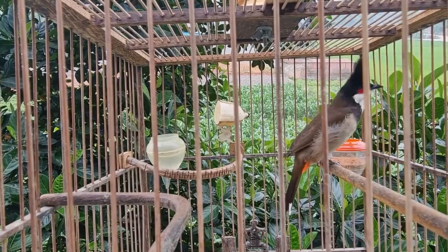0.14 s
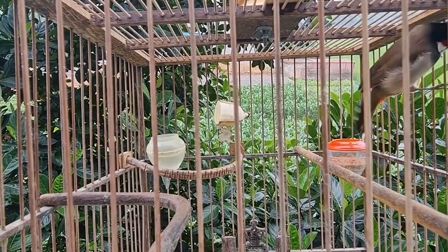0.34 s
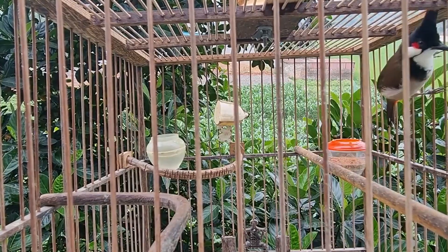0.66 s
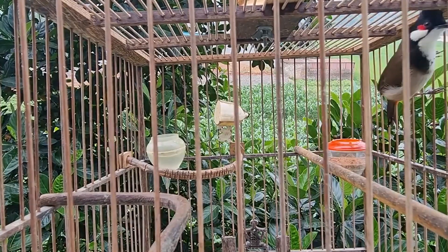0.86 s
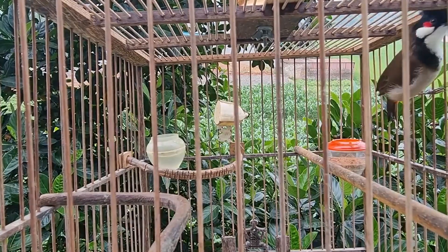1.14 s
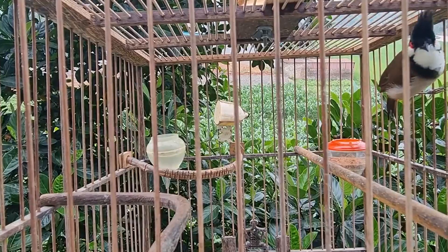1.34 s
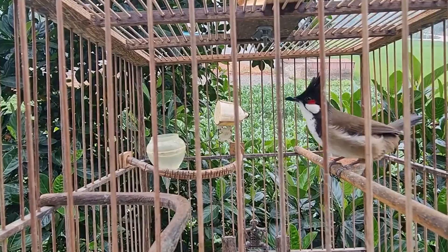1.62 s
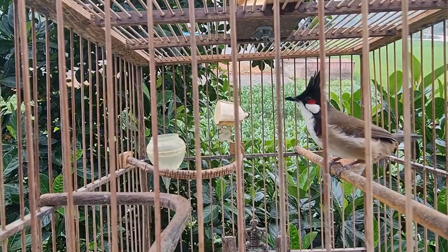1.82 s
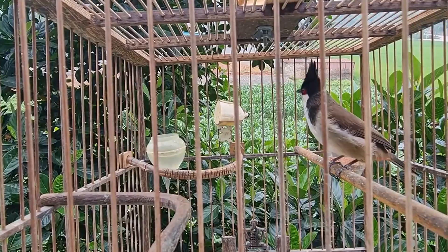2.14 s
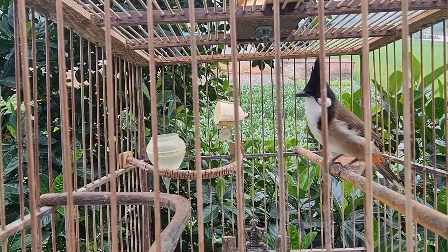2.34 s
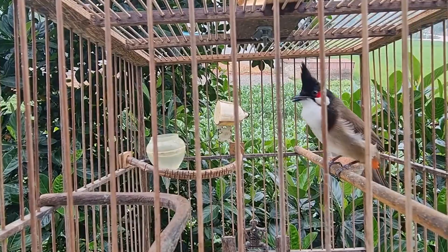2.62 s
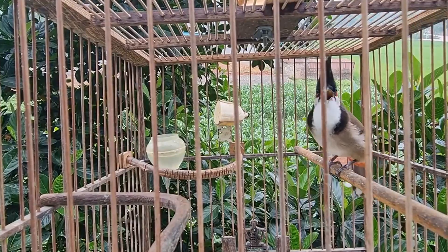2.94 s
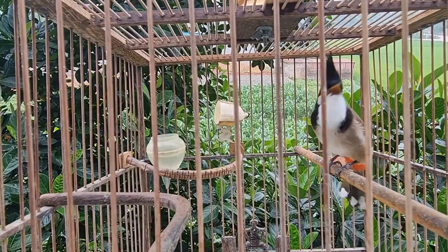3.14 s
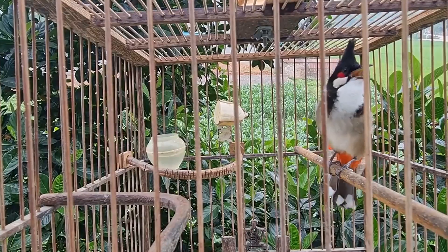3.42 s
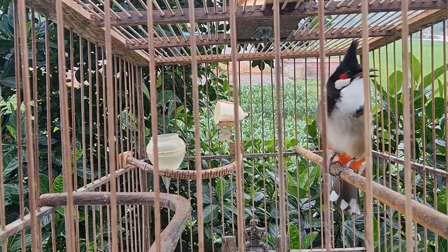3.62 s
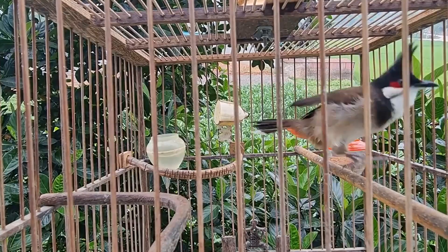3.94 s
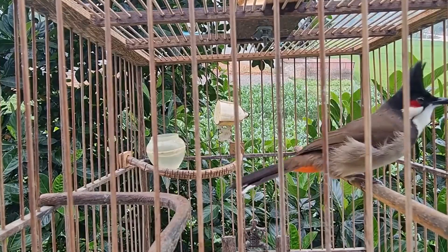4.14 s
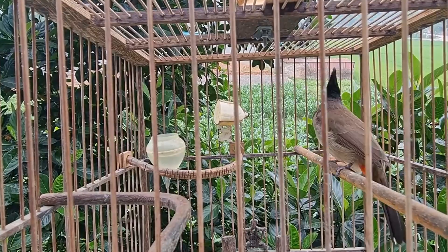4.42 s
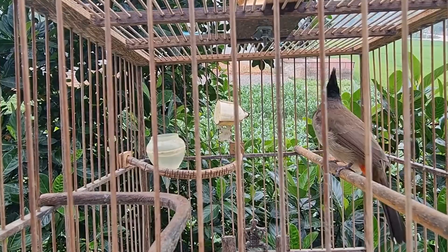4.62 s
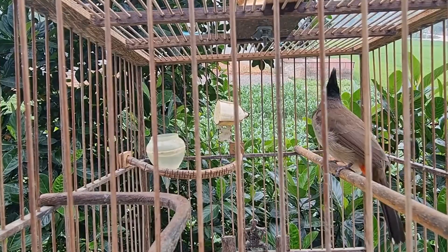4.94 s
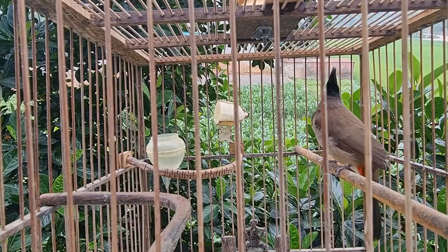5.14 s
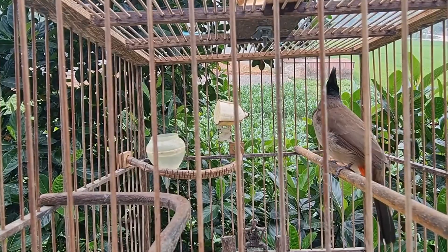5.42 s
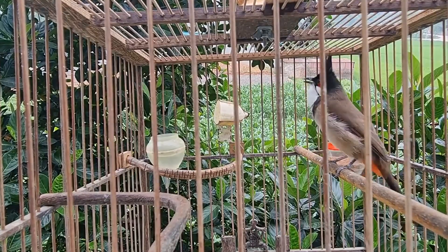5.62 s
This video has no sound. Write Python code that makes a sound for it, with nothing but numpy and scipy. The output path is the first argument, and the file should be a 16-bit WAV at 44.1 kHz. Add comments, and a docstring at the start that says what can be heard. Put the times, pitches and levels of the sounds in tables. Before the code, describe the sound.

The first two and a half seconds are quiet: faint falling whistles, chirps and soft hoots come from distant garden birds over a very low traffic rumble and hiss. A caged bulbul close by flicks its wings at about 0.5 seconds and again around 1.6, landing on its wooden perch with a soft thud. At 2.7 seconds it starts singing, loud and bright: quick, nearly pure whistled notes with a fast warble and a slightly raspy edge, many sweeping upward, running together until 3.9. A tiny hop follows at about 4 seconds, then one faint, distant hard knock at 4.4. From 4.6 a far engine putters softly. The bird sings one loud rising note at 5.2 and a short warbled phrase from about 5.5 to 5.7. The song sounds close, with only slight, quick reflections from the cage.

```python
"""Caged bulbul in a garden.

A red-whiskered bulbul sings short phrases close by: a nearly pure syrinx tone with a fast warble,
a raspy edge shaped by the beak, and quick echoes off its wooden cage. Before and between phrases
it hops, wings rustling and perch thudding. Other birds whistle further off and something hard is
knocked once. A far engine putters near the end; traffic rumble and faint hiss lie under it all."""
import sys
import numpy as np
from scipy import signal
from scipy.fft import rfft, irfft
from scipy.io import wavfile
from scipy.ndimage import uniform_filter1d, minimum_filter1d

SR = 44100
rng = np.random.default_rng(int(sys.argv[2]) if len(sys.argv) > 2 else 0)


def store_wav(level_fs):
    """Save 16-bit WAV to argv[1]."""
    pcm = np.round(np.clip(np.atleast_2d(level_fs), -1, 1) * 32767)
    wavfile.write(sys.argv[1], SR, pcm.T.astype(np.int16))


N = 254456
TIME = np.arange(N) / SR
CUTOFF_HZ = 16000

# Song notes: start_s, length_s, level_db, attack_s, release_s, warble_hz, depth_hz, pitch_path_hz
SONG_NOTES = [ (2.7256, .066, -9.5, .031, .009, 122, 39, (1353, 1650, 1799, 2266, 2174, 1737)),
              (2.7848, .048, -10.5, .007, 0.022, 108, 49, (1870, 2196, 2298, 1977, 1125)),
              (2.8136, 0.025, -12.5, .01, 0.019, 270, 340, (3150, 2100)),
              (3.0446, .041, -9, 0.01, 0.006, 88, 348, (2275, 2402, 2973, 3084, 2830)),
              (3.085, .013, -33.5, 0.013, .01, 100, 102, (2030, 570)),
              (3.2188, .06, -7.5, 0.038, .007, 109, 280, (1450, 1594, 2378, 2518, 2755, 3028, 2923, 2470)),
              (3.2784, 0.048, -15.5, .006, .01, 215, 140, (2604, 2244, 2165, 2320, 2570)),
              (3.3819, 0.019, -19.5, .004, .005, 185, 299, (2150, 2530)),
              (3.3945, 0.05, -6.5, .008, 0.016, 120, 21, (2890, 2894, 2840, 3000)),
              (3.492, 0.1, -11, 0.06, .063, 93, 350, (1428, 1687, 2578, 3080, 3503, 3873, 3979)),
              (3.6352, .066, -11, 0.03984, .018, 93, 116, (1650, 2168, 3390, 3088, 3244, 3120, 3210)),
              (3.7375, .027, -18.5, .007, 0.0022, 104, 182, (2650, 2580)),
              (3.7606, .033, -10, 0.00699, 0.014, 122, 26, (2490, 2390, 2240)),
              (3.7896, .051, -14, .003, 0.033, 112, 140, (2428, 2377, 2162, 2260)),
              (3.8311, 0.063, -24.5, 0.0068, 0.018, 108, 35, (1755, 1753)),
              (5.1945, 0.093, -8, 0.023, 0.029, 278, 225, (1253, 3213, 3314, 3354, 3503, 3757, 4055)),
              (5.5505, .114, -9, 0.044, 0.025, 93, 228, (1795, 2278, 2431, 2820, 2937, 2896, 2850)),
              (5.7056, 0.037, -14.5, 0.024, .018, 128, 33, (2104, 1933, 2570, 2250, 2290)), ]
# Head poses: from_s, bright_db, beak_hz, pan_left_db, lead_scale, garden_db
HEAD_POSES = [ (2.6, 2, 13060, -1, .95, -8.5), (2.95, 1.5, 12520, 0, 1.07, -7.5),
              (3.15, 3, 11520, 0.6, 1.1, -5.5), (3.35, 0, 14400, 1.8, 1.12, -7.5),
              (3.46, 5.5, 11200, 1.5, 1.25, -1.5), (3.6, 5, 9910, 1.5, 1.37, 0),
              (3.71, -0.5, 13250, 6, 1.85, -5), (5, -0.5, 8830, -0.5, 1.03, -4),
              (5.4, -1.5, 9300, -.8, 0.92, -1.5), (5.68, 0.5, 14100, -.8, 0.85, -1.5), ]
# Phase lead of the left channel: freq_hz, lead_rad
LEFT_LEAD = [(300, .1), (1400, .5), (2300, 0.54), (3000, 1.3), (3900, 2.48), (5000, 5.4), (6400, .1),
             (16000, .05)]
# Syrinx overtones and half-order partials: pitch_ratio, gain_db
SONG_PARTIALS = [(.5, -54.5), (1.5, -57.5), (2, -49), (3, -47), (4, -49.5), (5, -42.5), (6, -39.5),
                 (7, -51.5)]
# Rasp spectrum: freq_hz, gain_db
RASP_SPECTRUM = [(700, -13), (1500, -1), (3500, 3.5), (4400, -16), (5200, -21), (6800, -7.5), (8000, -10),
                 (9500, -4), (12500, -2.5), (14800, -2), (16000, -8.5)]


def bulbul(jitter_hz=8, jitter_share=.23, crest_share=.25, blur_rad=.092, rasp_db=-51, edge_power=.75,
           clean_below_hz=1300, warble_onset_span_hz=1050, throb_scale_hz=370):
    """Syrinx tone, warbling in pitch and loudness. Returns tone, bright edge and garden send."""
    tone, bright, thrown = np.zeros((2, N)), np.zeros((2, N)), np.zeros(N)
    rasp = from_db(rasp_db) * noise(RASP_SPECTRUM, [(700, .6), (16000, .7)])[0]
    wander, blur = drift(900, N), blur_rad * drift(1200, N)
    for start, length, level_db, attack, release, warble_hz, depth_hz, pitches in SONG_NOTES:
        pose = [row for row in HEAD_POSES if row[0] <= start + length / 2][-1]
        _, bright_db, beak_hz, pan_db, lead_scale, garden_db = pose
        on = (TIME >= start) & (TIME <= start + length)
        age = TIME[on] - start
        pitch = np.interp(age, np.linspace(0, length, len(pitches)), pitches)
        depth = depth_hz * np.clip((pitch - clean_below_hz) / warble_onset_span_hz, 0, 1)
        cycle = 2 * np.pi * warble_hz * age
        warbled = pitch + depth * (-.74 * np.cos(cycle) + crest_share * np.cos(2 * cycle))
        jitter = (jitter_hz + jitter_share * depth) * wander[on]
        phase = 2 * np.pi * np.cumsum(warbled + jitter) / SR
        throb = np.tanh(depth / throb_scale_hz)
        tremolo = (1 - throb * np.cos(cycle)) / np.sqrt(1 + throb ** 2 / 2)
        level = from_db(level_db) * envelope(age, length, attack, release) * tremolo
        lead_rad = lead_scale * at_hz(LEFT_LEAD, warbled)
        whistle = np.sqrt(2) * level * np.sin([phase + lead_rad, phase])
        partials = sum(from_db(db) * np.sin(ratio * (phase + blur[on])) * (ratio * pitch < CUTOFF_HZ)
                       for ratio, db in SONG_PARTIALS)
        # The edge grows more slowly than the tone.
        edge = from_db(bright_db) * np.abs(level) ** edge_power * (partials + rasp[on])
        tone[:, on] += from_db(np.array([[pan_db], [-pan_db]]) / 2) * whistle
        bright[:, on] += beak(edge, beak_hz)
        thrown[on] += from_db(garden_db) * whistle[1]
    return tone, bright, thrown


def envelope(age_s, length_s, attack_s, release_s, edge_db=-29, fade_s=.002):
    """Note gain: swells from edge_db, holds, sinks back."""
    opening = np.clip(1 - age_s / attack_s, 0, 1) ** 2
    closing = np.clip(1 - (length_s - age_s) / release_s, 0, 1) ** 2
    fade = np.clip(np.minimum(age_s, length_s - age_s) / fade_s, 0, 1)
    return from_db(edge_db * (opening + closing)) * fade


# Throat response: freq_hz, gain_db
THROAT_RESPONSE = [(4200, 0), (4600, -9.5), (5100, -22.5)]


def throat(tone):
    """The throat passes the tone and little above it."""
    hz = np.arange(N // 2 + 1) * SR / N
    return irfft(rfft(tone) * from_db(at_hz(THROAT_RESPONSE, hz)), N)


# Beak notch just above the tone: freq_hz, gain_db
BEAK_NOTCH = [(4300, 3), (5100, -11.5), (6300, -0.5)]


def beak(x, centre_hz, peak_db=8, width_hz=2200, ripple_db=5.5, ripple_hz=450):
    """The open beak favours one treble band; cage bars ripple the spectrum, anew for each note."""
    hz = np.arange(len(x) + 1) * SR / (2 * len(x))
    ripple = np.interp(hz, np.arange(100) * ripple_hz, rng.standard_normal(100))
    resonance_db = peak_db / (1 + (2 * (hz - centre_hz) / width_hz) ** 2)
    gain_db = resonance_db + ripple_db * ripple + at_hz(BEAK_NOTCH, hz)
    return irfft(rfft(x, 2 * len(x)) * from_db(gain_db))[:len(x)]


# Echoes off roof, tray and ground: delay_s, left_db, right_db
CAGE_ECHOES = [(.0021, -18, -22), (.0047, -14, -14), (.0083, -20.5, -20)]


def cage(x):
    """Nearby wood and ground return the song a few milliseconds late."""
    out = x.copy()
    for delay_s, left_db, right_db in CAGE_ECHOES:
        for channel, db in enumerate((left_db, right_db)):
            out[channel] += from_db(db) * np.interp(TIME - delay_s, TIME, x[channel], left=0)
    return out


# Wing flicks: peak_s, width_s, gain_db
WING_FLICKS = [(0.449, 0.014, -51.5), (0.516, 0.0076, -51.5), (0.763, 0.0056, -59), (1.585, 0.0099, -49.5),
               (1.658, 0.013, -55), (4.035, .018, -67.5)]
# Feather spectrum: freq_hz, gain_db
FEATHER_SPECTRUM = [(150, -6), (500, 9), (1100, -1), (2000, -7), (5000, -1), (9000, 0.5), (14000, -5),
                    (16000, -2.5)]


def wings(flutter_db=4, trim_db=-3.5, swell_widths=1.1, fade_widths=1.4, tick_db=2, tick_s=.0015):
    """Feathers swell to a tick and rustle away."""
    puffs = 0
    for peak_s, width_s, db in WING_FLICKS:
        age = TIME - peak_s
        rustle = np.exp(-np.abs(age) / (width_s * np.where(age < 0, swell_widths, fade_widths)))
        tick = from_db(tick_db) * np.exp(-np.abs(age) / tick_s)
        puffs += from_db(db) * (rustle + tick)
    flutter = from_db(flutter_db * drift(700, N) + trim_db)
    return puffs * flutter * noise(FEATHER_SPECTRUM, [(150, .2), (16000, .17)])


# Feet landing: start_s, gain_db
FOOT_LANDINGS = [(.512, -69), (1.615, -88), (1.658, -49.5), (4.09, -60.5)]
# Perch modes: freq_hz, gain_db, t60_s
PERCH_MODES = [(138, 2.5, 0.83), (266, -37, .15), (388, -8, 0.16), (1153, -4.5, 0.081)]


def perch():
    """The perch thuds as the feet land."""
    return strike(FOOT_LANDINGS, PERCH_MODES)


# Falling slurs of a second bulbul: start_s, length_s, pitch_hz, gain_db
SLURS = [(.305, 0.11, 3260, -56.5), (.48, .105, 3227, -55), (.665, 0.093, 3187, -56),
         (.863, .1, 3023, -59.5), (1.084, 0.089, 2973, -60.5), (1.244, 0.12, 2480, -59.5),
         (1.373, 0.12, 2613, -61), (1.94, .09, 2845, -51), (2.147, 0.094, 2840, -62.5)]
# Buzzy rising chirps: start_s, length_s, pitch_hz, gain_db
CHIRPS = [(0, .16, 2900, -70), (1.156, .13, 2400, -63), (1.593, .085, 3330, -56.5),
          (1.785, .057, 2640, -58), (1.892, .069, 3280, -51), (2.093, .066, 3190, -64),
          (2.623, .18, 3490, -53.5)]
# Long thin whistles: start_s, length_s, first_hz, middle_hz, last_hz, gain_db
WHISTLES = [(0.569, .5, 6270, 5100, 4750, -66), (5.002, 0.65, 3605, 3960, 4660, -68.5)]
# Soft arching hoots: start_s, length_s, pitch_hz, gain_db
SOFT_HOOTS = [(1.319, .11, 635, -58), (1.657, .24, 585, -69.5), (2.567, .16, 605, -66.5),
              (4.022, .13, 560, -64)]


def far_birds(trim_db=-1, tsip_every_s=.1865, tsips_until_s=2.7):
    """Five kinds of distant call, each with its own pitch bend, trailing garden echoes."""
    calls = sum(glide(s, length, hz * np.array([.98, .935, .79]), db, depth_hz=85, lateness=1.3)
                for s, length, hz, db in SLURS)
    calls += sum(glide(s, length, hz * np.array([.94, .98, 1.01]), db, depth_hz=.06 * hz)
                 for s, length, hz, db in CHIRPS)
    calls += sum(glide(s, length, path_hz, db, depth_hz=60, lateness=1.34)
                 for s, length, *path_hz, db in WHISTLES)
    calls += sum(glide(s, length, hz * np.array([.86, 1, .89]), db, depth_hz=20)
                 for s, length, hz, db in SOFT_HOOTS)
    # A small bird repeats a thin upsweep.
    calls += sum(glide(s, length_s=.04, path_hz=(4900, 5500, 6500), gain_db=-81.5, depth_hz=90)
                 for s in np.arange(0, tsips_until_s, tsip_every_s))
    echoes = from_db(-6) * scatter(calls, t60_s=.65, top_hz=7000, delay_s=.006)
    return from_db(trim_db) * (calls + echoes)


def glide(start_s, length_s, path_hz, gain_db, depth_hz, lateness=1, warble_hz=105):
    """Warbling whistle bent through three pitches; lateness over 1 delays its swell."""
    out, on = np.zeros(N), (TIME >= start_s) & (TIME < start_s + length_s)
    age = TIME[on] - start_s
    pitch = np.polyval(np.polyfit([0, .5, 1], path_hz, 2), age / length_s)
    pitch += depth_hz * (np.sin(2 * np.pi * warble_hz * age) + .5 * drift(440, len(age)))
    swell = np.sqrt(2 * np.abs(np.sin(np.pi * (age / length_s) ** lateness)))
    out[on] = from_db(gain_db) * swell * np.sin(2 * np.pi * np.cumsum(pitch) / SR)
    return out


# Knock resonances: centre_hz, width_hz, level_db, t60_s
KNOCK_BANDS = [(1231, 50, -56, 0.78), (2903, 170, -50, 0.89), (2930, 740, -56.5, 0.84),
               (6140, 5000, -63.5, .12)]


def knock(start_s=4.445):
    """A distant hard knock; garden echoes smear its resonances into noise bands."""
    age = np.maximum(TIME - start_s, 0)
    ring = 0
    for hz, width_hz, db, t60_s in KNOCK_BANDS:
        resonance = band(rng.standard_normal((2, N)), hz - width_hz / 2, hz + width_hz / 2)
        ring += rms_one(resonance) * from_db(db - 60 * age / t60_s)
    return (age > 0) * ring


# Exhaust modes: freq_hz, gain_db, t60_s
EXHAUST_MODES = [(90, -10, .05), (258, -3, .07), (335, -4, .06)]


def engine(start_s=4.618, beat_hz=13.9, gain_db=-53, uneven_db=2):
    """Slow beats of uneven strength ring a far engine's exhaust."""
    beats_s = np.arange(start_s, TIME[-1], 1 / beat_hz)
    return strike([(s, gain_db + uneven_db * rng.standard_normal()) for s in beats_s], EXHAUST_MODES)


# Traffic spectrum: freq_hz, gain_db
TRAFFIC_SPECTRUM = [(25, -9), (55, -2), (100, -2.5), (170, -9.5), (300, -4.5), (450, -14), (600, -14.5),
                    (1000, -26), (2000, -41), (16000, -80)]
# Traffic course: time_s, level_db
TRAFFIC_LEVELS = [(0, -61.5), (1.0, -60.5), (1.8, -59), (3.0, -61), (3.9, -64), (4.05, -60), (4.35, -61),
                  (4.7, -58.5), (5.77, -60.5)]
# Garden hiss spectrum: freq_hz, gain_db
HISS_SPECTRUM = [(300, -3), (1000, -1), (1600, -4), (2600, 0.5), (3600, -4.5), (5000, -8.5), (9000, -16.5),
                 (12500, -29), (16000, -36.5)]
# Garden hiss course: time_s, level_db
HISS_LEVELS = [(0, -71.5), (1.35, -68.5), (2.4, -68.5), (4.0, -73.5), (4.6, -71), (5.77, -76.5)]
# Left-right likeness of both: freq_hz, correlation
TOWN_CORRELATION = [(30, 0.17), (120, .8), (300, 0.11), (800, 0.034), (16000, 0.089)]


def town(waver_db=.2):
    """Far traffic rumbles, wavering slightly, under the faint hiss of the garden."""
    rumble_db = np.interp(TIME, *np.transpose(TRAFFIC_LEVELS)) + waver_db * drift(12, N)
    rumble = from_db(rumble_db) * noise(TRAFFIC_SPECTRUM, TOWN_CORRELATION)
    hiss_db = np.interp(TIME, *np.transpose(HISS_LEVELS))
    return rumble + from_db(hiss_db) * noise(HISS_SPECTRUM, TOWN_CORRELATION)


def strike(blows, modes):
    """Each blow (start_s, gain_db) rings the same modes (freq_hz, gain_db, t60_s)."""
    clicks = np.zeros(N)
    for start_s, db in blows:
        clicks[min(int(start_s * SR), N - 1)] += from_db(db)
    t = TIME[:SR]
    ring = sum(from_db(db - 60 * t / t60_s) * np.sin(2 * np.pi * hz * t) for hz, db, t60_s in modes)
    return signal.fftconvolve(clicks, ring)[:N]


def scatter(x, t60_s, top_hz, delay_s):
    """Dense decaying reflections, different on each side; unit power gain."""
    t = TIME[:SR]
    tail = band(rng.standard_normal((2, SR)), 300, top_hz) * from_db(-60 * t / t60_s) * (t > delay_s)
    tail /= np.sqrt(np.sum(tail ** 2, axis=1, keepdims=True) + 1e-20)
    return signal.fftconvolve(np.atleast_2d(x), tail, axes=1)[:, :N]


def noise(spectrum, correlation):
    """Stereo noise of given spectrum and left-right correlation; rms 1."""
    hz = np.arange(N // 2 + 1) * SR / N
    alike = np.clip(at_hz(correlation, hz), -1, 1)
    mid, side = rfft(rng.standard_normal((2, N))) * from_db(at_hz(spectrum, hz))
    return rms_one(irfft(np.sqrt(1 + alike) * mid + np.sqrt(1 - alike) * side * [[1], [-1]], N))


def drift(rate_hz, size):
    """Random wander of spread about 1."""
    steps = np.arange(size) * rate_hz / SR
    count = int(steps[-1]) + 2
    return np.interp(steps, np.arange(count), rng.standard_normal(count))


def band(x, low_hz, high_hz):
    """Gentle band-pass."""
    edges_hz = [max(low_hz, 20), min(high_hz, .45 * SR)]
    return signal.sosfilt(signal.butter(2, edges_hz, "band", fs=SR, output="sos"), x)


def at_hz(points, hz):
    """Interpolate on a log-frequency axis."""
    freqs, values = np.transpose(points)
    return np.interp(np.log(np.maximum(hz, 1)), np.log(freqs), values)


def from_db(db):
    """Decibels to gain."""
    return 10 ** (np.asarray(db) / 20)


def rms_one(x):
    """Scale to rms 1."""
    return x / np.sqrt(np.mean(x ** 2) + 1e-20)


def scene():
    """The song, scattered by bars, shrubs and garden, over the hops and the background."""
    tone, bright, thrown = bulbul()
    tone = throat(tone)
    bars = from_db(-2) * scatter(bright, t60_s=.088, top_hz=17100, delay_s=.00088)
    shrubs = from_db(-25) * scatter(tone, t60_s=.085, top_hz=9000, delay_s=.004)
    garden = from_db(-38) * scatter(thrown, t60_s=.65, top_hz=5000, delay_s=.02)
    song = cage(tone) + bright + bars + shrubs + garden
    return song + far_birds() + wings() + perch() + knock() + engine() + town()


def record(dry, ceiling=.95):
    """Fast peak limiter, then a steep low-pass."""
    allowed_gain = np.minimum(1, ceiling / (np.abs(dry).max(axis=0) + 1e-9))
    gain = uniform_filter1d(minimum_filter1d(allowed_gain, size=201), size=151)
    return signal.sosfilt(signal.ellip(12, .1, 100, CUTOFF_HZ, fs=SR, output="sos"), dry * gain)


dry = scene()
out = record(dry)
store_wav(out)
```